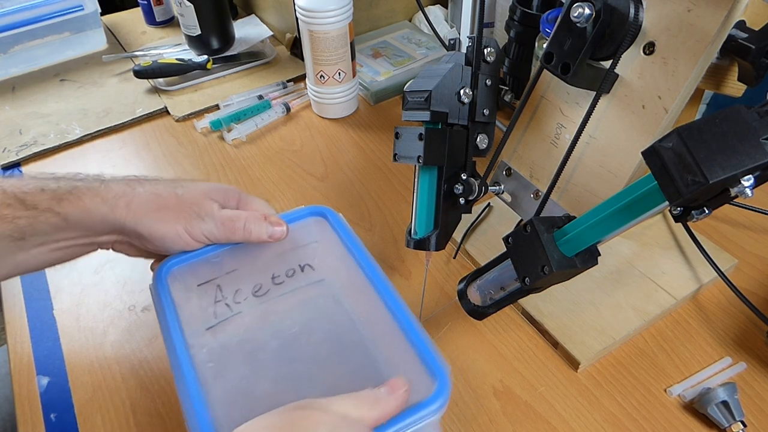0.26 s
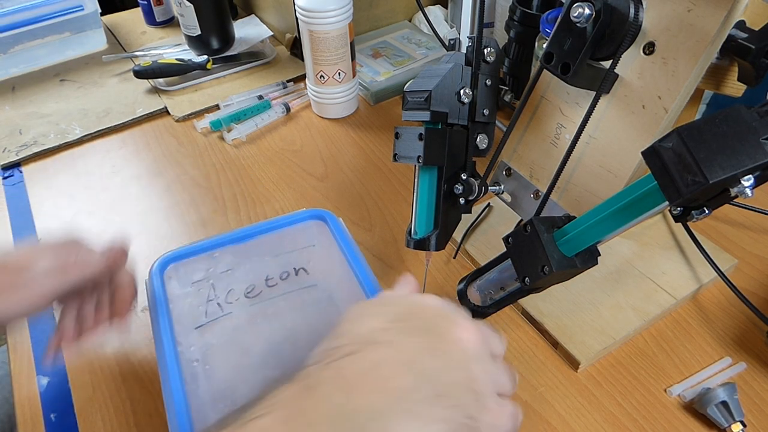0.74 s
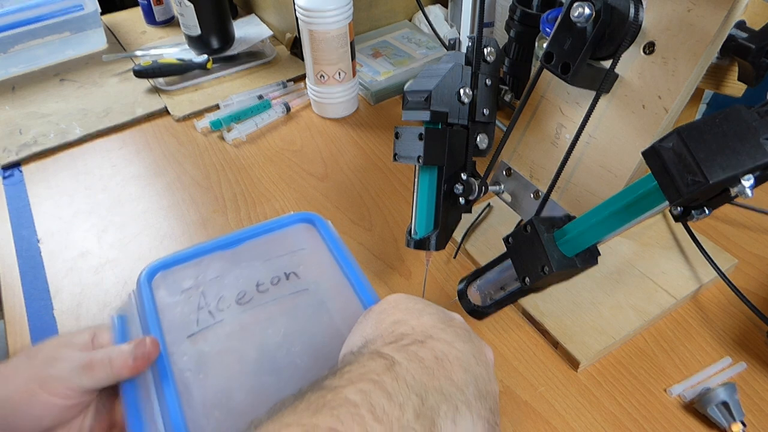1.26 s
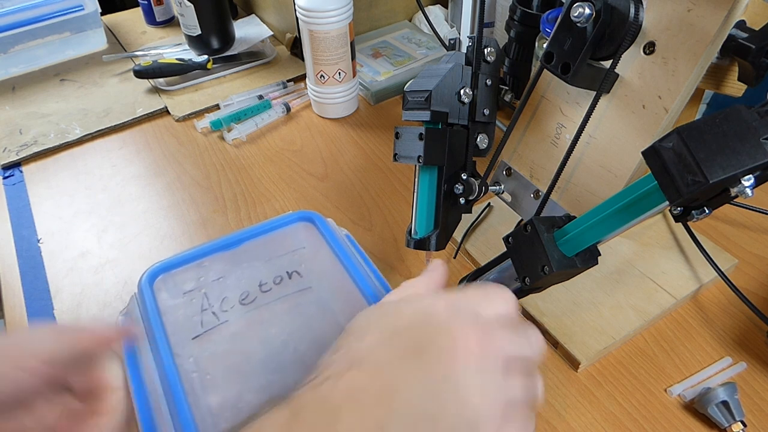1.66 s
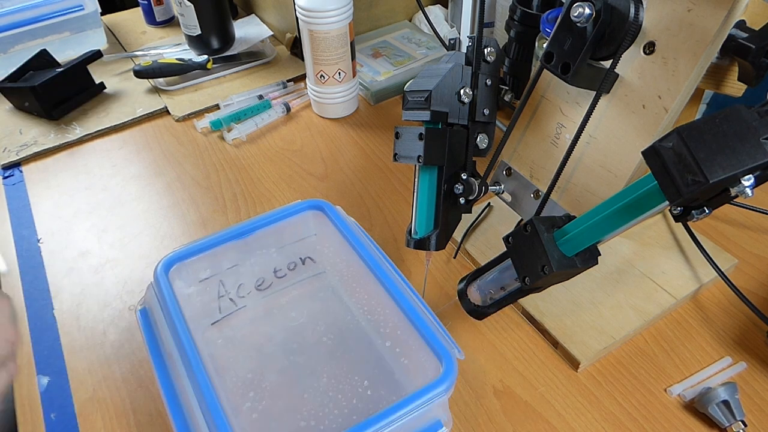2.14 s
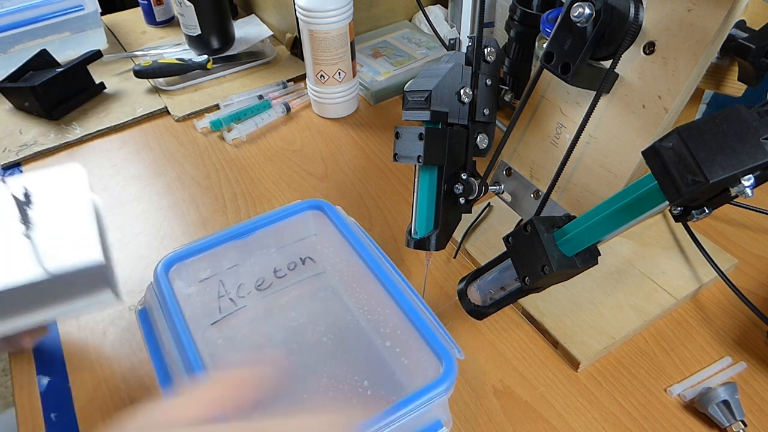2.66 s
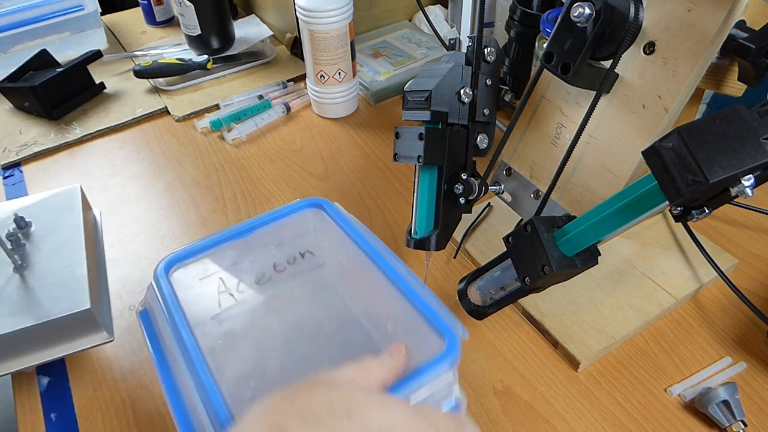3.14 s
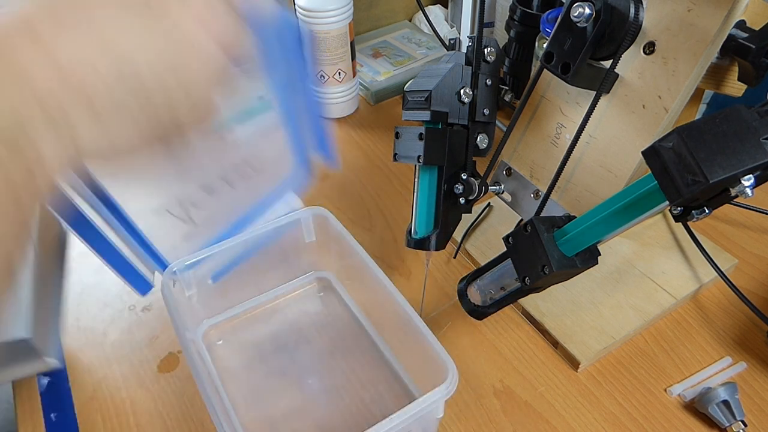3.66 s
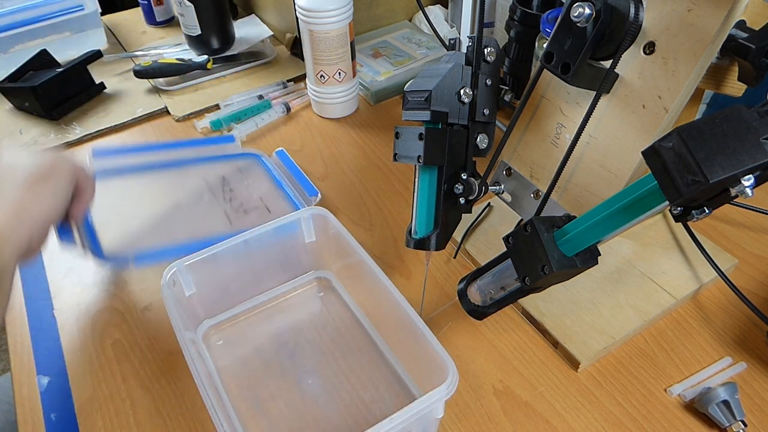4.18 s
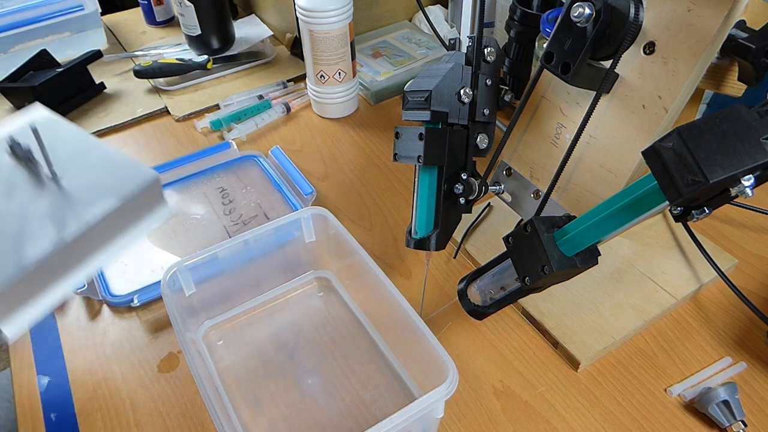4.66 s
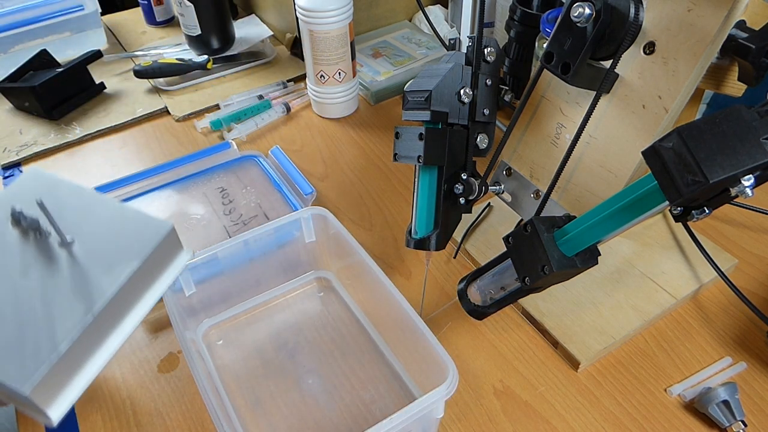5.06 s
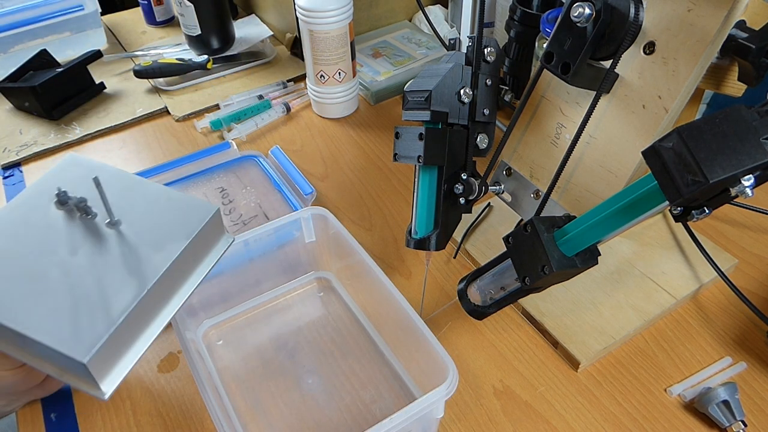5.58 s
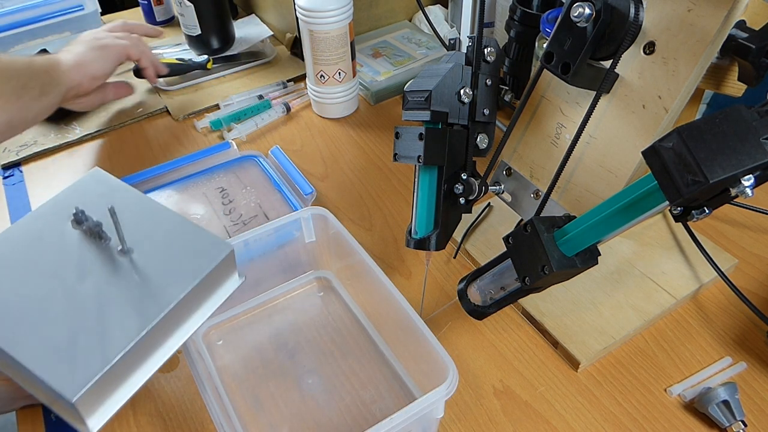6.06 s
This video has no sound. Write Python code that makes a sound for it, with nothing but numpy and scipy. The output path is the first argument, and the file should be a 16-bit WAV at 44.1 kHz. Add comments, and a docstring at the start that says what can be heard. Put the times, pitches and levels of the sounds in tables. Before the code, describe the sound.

A small workshop heard close up in stereo, with soft steady air noise, a low fan hum and a very faint, thin, wavering high whine throughout. At about 0.2 s a flap on a sealed plastic box snaps, a sharp crack with a short hollow boom through the wooden bench. Faint bumps and a light rub follow, with a small judder near 0.9-1.1 s. At 1.3 s two more snaps come almost together, equally loud and drum-like. Only faint sliding until a softer knock at 2.9 s and a weaker one at 3.15 s. From 3.5 to 3.8 s the lid works loose with small dull bumps. It clatters onto the bench from 3.95 s: a thin bright crack, then hard dry clacks at 4.1 and 4.25 s, the strongest at 4.4 s. Near-quiet follows, with a soft bump at 6.0 s and a tiny bright tool tick and rub at 6.2 s.

```python
"""Snap-lock box opened in a workshop

Flaps snap and make a closed plastic box boom on a wooden bench; the freed lid clatters down beside it.
Box and lid are decaying modes led by a scattered impulse, each blow set to its own band levels.
Hands bump (short swelling tones) and rub (resonant noise); a small tool ticks (a decaying noise burst).
Behind them: coloured air noise, a fan's hum of narrow noise resonances and a thin wavering whine."""
import sys
import numpy as np
from scipy import signal
from scipy.fft import rfft, irfft
from scipy.io import wavfile

SR = 44100
rng = np.random.default_rng(int(sys.argv[2]) if len(sys.argv) > 2 else 0)


def waveform_to_disk(signal):
    """Save audio, clipped to [-1, 1], as 16-bit WAV at the path in sys.argv[1]."""
    frames = np.transpose(np.atleast_2d(signal))
    scaled = np.clip(frames, -1, 1) * 32767
    samples = np.round(scaled).astype(np.int16)
    wavfile.write(sys.argv[1], SR, samples)


N = 278680
BLOW_S = 0.35  # buffer length of blows, bumps, ticks and room response

BENCH_HZ, EDGE_HZ = 171, 8100  # wooden bench, hard edge of the lid
# fall of level (below, above) the pitch of a sounding part [dB per octave]
BOOM_FALL, SNAP_FALL = (20.6, 14), (10, 9)
CLACK_FALL, CRACK_FALL = (15.5, 12.7), (3, 3)
THUD_FALL = (9, 9)

# modes of the closed box: (frequency [Hz], relative level [dB], t60 [s])
BOX_MODES = [(189, -6, 0.091), (253.3, -3.5, 0.052), (288, -11, 0.085), (331.7, -5.5, 0.074),
             (395, 2, 0.03), (479, -2.5, 0.032), (572, -4, 0.023), (702, 4.5, 0.016), (873, -1.5, 0.018),
             (1087, -7.5, 0.035), (1314, -21, 0.039), (1690, -9, 0.0057), (2166, -4.5, 0.0077),
             (2430, -28, 0.12), (2550, -29, 0.095), (3100, -6, 0.019), (4250, -6.5, 0.016),
             (5270, -18, 0.0075)]
# flaps snapping, box knocking on the bench, relative levels:
# (time [s], wall pitch [Hz], boom [dB], struck spot pitch [Hz], snap [dB], bench thud [dB])
BOX_BLOWS = [(0.164, 446, -10, 1900, -23.5, -23.5), (1.3205, 344, -11, 2900, -26, -24),
             (1.3744, 332, -11.5, 2480, -21.5, -37), (2.9305, 370, -20, 640, -39, -39),
             (3.1507, 300, -30, 443, -52, -45)]


def box():
    """The flaps let go and the sealed box booms like a drum."""
    out = np.zeros((2, N))
    for time_s, wall_hz, boom_db, spot_hz, snap_db, thud_db in BOX_BLOWS:
        boom = (wall_hz, boom_db, BOOM_FALL)
        snap = (spot_hz, snap_db, SNAP_FALL)
        thud = (BENCH_HZ, thud_db, THUD_FALL)
        sound = blow(BOX_MODES, spot_hz, band_levels(boom, snap, thud),
                     spot_db=4, spot_q=16, swell_cycles=0.34, crack_db=25, spread_s=0.00022,
                     crack_low_hz=660, scatter_db=4.0, tail_db=-6.5)
        add(out, time_s, sound)
    return from_db(1.55) * out


# modes of the loose lid: (frequency [Hz], relative level [dB], t60 [s])
LID_MODES = [(196, -18, 0.08), (282.2, -16.5, 0.054), (370, -10, 0.06), (545, -14.5, 0.052),
             (700, -9.5, 0.015), (856, -3, 0.032), (1004, -8.5, 0.042), (1132, -15, 0.036),
             (1420, -10.5, 0.012), (1940, -22, 0.04), (2600, -12, 0.018), (3190, -6.5, 0.016),
             (4820, -15, 0.012), (6890, 0, 0.0086), (9700, -21, 0.003)]
# lid and its flaps hitting the bench, relative levels:
# (time [s], struck spot pitch [Hz], clack [dB], crack [dB], bench thud [dB])
LID_BLOWS = [(3.9464, 927, -39, -32.5, -51), (3.9774, 475, -37.5, -40.5, -33),
             (3.9814, 1090, -50, -49, -54), (4.128, 890, -24.5, -42, -35.5), (4.1395, 1900, -44, -50, -52),
             (4.227, 1040, -25, -47.5, -36.5), (4.2589, 921, -21, -48, -38.5),
             (4.4065, 883, -12.5, -37, -40)]


def lid():
    """The free lid is lighter: each hit clacks near the pitch of the struck spot."""
    out = np.zeros((2, N))
    for time_s, spot_hz, clack_db, crack_db, thud_db in LID_BLOWS:
        clack = (spot_hz, clack_db, CLACK_FALL)
        edge = (EDGE_HZ, crack_db, CRACK_FALL)
        thud = (BENCH_HZ, thud_db, THUD_FALL)
        sound = blow(LID_MODES, spot_hz, band_levels(clack, edge, thud),
                     spot_db=2, spot_q=12.4, swell_cycles=1.0, crack_db=25.0, spread_s=0.00018,
                     crack_low_hz=920, scatter_db=3.5, tail_db=-4)
        add(out, time_s, sound)
    return from_db(0.5) * out


def blow(modes, spot_hz, band_db, spot_db, spot_q, swell_cycles, crack_db, spread_s, crack_low_hz,
         scatter_db, tail_db, chatter_db=-11, chatter_s=0.005, chatter_count=3):
    """A crack leads, modes of random strength swell and ring, the struck spot adds a short ring."""
    t = time_axis()
    hz, db, t60_s = np.transpose(modes)[:, :, None]
    strength = from_db(db + scatter_db * rng.standard_normal(hz.shape))
    swell = 1 - np.exp(-t * hz / swell_cycles)  # bending waves spread more slowly the lower they are
    decay = from_db(-60 * t / t60_s)
    ring = np.sum(strength * swell * np.sin(2 * np.pi * hz * t) * decay, axis=0)
    spot_decay = np.exp(-np.pi * spot_hz * t / spot_q)
    spot = from_db(spot_db) * np.sin(2 * np.pi * spot_hz * t) * spot_decay

    contact = crack(len(t), spread_s)
    lags = (rng.uniform(0.15, 1, chatter_count) * chatter_s * SR).astype(int)
    for lag in lags:  # the edge chatters before it settles
        contact[lag:] += from_db(chatter_db) * crack(len(t) - lag, spread_s)
    contact = from_db(crack_db) * cut(contact, crack_low_hz, "high", order=2)

    sound = workshop(radiated(ring + spot + contact), tail_db)
    return voiced(voiced(sound, band_db), band_db)  # twice, as neighbouring bands overlap


def crack(size, spread_s, count=9, feedback=0.82):
    """Thin walls scatter an impulse through all-passes into a dense burst with every pitch alike."""
    burst = signal.unit_impulse(size)
    for lag in np.ceil(rng.uniform(0.05, 1, count) * spread_s * SR).astype(int):
        loop = np.r_[1, np.zeros(lag - 1), feedback * rng.choice([-1, 1])]
        burst = signal.lfilter(loop[::-1], loop, burst + 1e-18)
    return burst


# edges of the bands that set the force of a blow: (frequency [Hz])
BAND_EDGES_HZ = [110, 220, 420, 800, 1400, 3300, 6000, 14000]


def band_levels(*parts):
    """Sums the power of sounding parts (pitch Hz, dB, fall below and above it) in each band."""
    edges, power = np.array(BAND_EDGES_HZ), 0
    centres = np.sqrt(edges[1:] * edges[:-1])
    for hz, db, (below, above) in parts:
        octaves = np.log2(centres / hz)
        fall = np.where(octaves < 0, below, above)
        power = power + from_db(db - fall * np.abs(octaves)) ** 2
    return 10 * np.log10(power)


def voiced(x, band_db):
    """A causal equaliser steers the band levels of a blow's first 30 ms to their targets."""
    size, head, edges = 2 ** 15, int(0.03 * SR), np.array(BAND_EDGES_HZ)
    hz = np.maximum(np.fft.rfftfreq(size, 1 / SR), 1)
    power = 2 * np.abs(rfft(x.mean(0)[:head], size)) ** 2 / (size * head)
    now_db = [10 * np.log10(power[(hz >= low) & (hz < high)].sum())
              for low, high in zip(edges, edges[1:])]
    log_centres = np.log(edges[1:] * edges[:-1]) / 2
    gain = from_db(np.interp(np.log(hz), log_centres, np.array(band_db) - now_db))
    cepstrum = irfft(np.log(gain))[:size // 2]  # minimum phase: nothing sounds early
    cepstrum[1:] *= 2
    return irfft(rfft(x, size) * np.exp(rfft(cepstrum, size)))[:, :x.shape[1]]


# single soft bumps of hands and things: (time [s], relative peak [dB], pitch [Hz])
BUMPS = [(.004, -35, 337), (0.44, -39.5, 208), (1.009, -31, 332), (1.018, -30, 612), (1.119, -39.5, 388),
         (3.472, -31.5, 500), (3.516, -38, 600), (3.667, -33.5, 516), (3.794, -24.5, 522),
         (3.796, -33, 1110), (6.015, -37, 198)]


def bumps(cycles=1.17, spread=1.53, side_db=-6):
    """A soft contact swells and dies within a few cycles, around a pitch set by what is touched."""
    out, t = np.zeros(N), time_axis()
    for time_s, db, hz in [*BUMPS, *slips()]:
        turn, age = 2 * np.pi * hz * t, hz * t / cycles
        sides = from_db(side_db) * (np.sin(turn * spread) - np.sin(turn / spread))
        thump = (np.sin(turn) + sides) * age * np.exp(-age)
        add(out, time_s, from_db(db) * thump / np.abs(thump).max())
    return from_db(-2.0) * out


# box juddering over the bench, lid working loose:
# (start [s], length [s], relative peak [dB], pitch [Hz])
SHUFFLES = [(0.886, .08, -34, 225), (1.863, .05, -40, 125), (3.522, .03, -41, 200), (3.674, .015, -32, 169)]
SLIPS_PER_S, SLIP_JITTER_PERIODS = 60, 0.1447
SLIP_SCATTER_DB, SLIP_PITCH_SPREAD = 1.5, 0.12  # pitch spread in natural-log units


def slips():
    """A shuffle sticks and slips: an uneven run of soft bumps, as (s, relative peak dB, pitch Hz)."""
    for start_s, length_s, db, hz in SHUFFLES:
        ages = np.arange(0, length_s, 1 / SLIPS_PER_S)
        for age, (late, strong, high) in zip(ages, rng.standard_normal((32, 3))):
            time_s = start_s + age + SLIP_JITTER_PERIODS * late / SLIPS_PER_S
            yield time_s, db + SLIP_SCATTER_DB * strong, hz * np.exp(SLIP_PITCH_SPREAD * high)


# skin and plastic sliding:
# (start [s], length [s], relative level [dB], centre [Hz], width [Hz])
RUBS = [(0.398, 0.12, -57.5, 3300, 1510), (1.648, 0.046, -52.5, 2260, 2710), (1.842, 0.26, -69, 9000, 7000),
        (2.223, 0.05, -57, 1730, 600), (2.872, 0.087, -51.5, 3530, 1050), (4.491, 0.056, -61.5, 9500, 6000),
        (6.199, 0.091, -58.5, 3500, 2560), (6.203, 0.11, -58.5, 9600, 4500)]


def rubs(grain_db=3, hiss_db=-9, hiss_hz=10000, hiss_width_hz=4000):
    """Sliding is a stream of tiny slips into a broad resonance, with a fine hiss on top."""
    out = np.zeros(N)
    for start_s, length_s, db, hz, width_hz in RUBS:
        size = int(length_s * SR)
        grains = rng.standard_normal(size) * from_db(grain_db * rng.standard_normal(size))
        body = rms_one(resonance(resonance(grains, hz, width_hz), hz, width_hz * 2))
        hiss = rms_one(resonance(grains, hiss_hz, hiss_width_hz))
        fade = signal.windows.tukey(size, 0.4)
        add(out, start_s, from_db(db) * (body + from_db(hiss_db) * hiss) * fade)
    return from_db(0.5) * out


# a small tool is touched: (time [s], peak [dB], centre [Hz], width [Hz])
TOOL_TICKS = [(6.2035, -33.5, 3600, 2500)]


def tool(decay_s=0.0043):
    """A light, bright tick: a decaying noise burst through a broad resonance."""
    out, t = np.zeros(N), time_axis()
    for time_s, db, hz, width_hz in TOOL_TICKS:
        tick = resonance(rng.standard_normal(len(t)) * np.exp(-t / decay_s), hz, width_hz)
        add(out, time_s, from_db(db) * tick / np.abs(tick).max())
    return out


# near reflections off bench, drill stand and wall: (delay [s], level [dB], left minus right [dB])
ECHOES = [(.0036, -15.5, -1), (0.0114, -14.5, 0.5), (.0145, -18.5, -5.5), (0.028, -18.5, -1.5)]
# reverberation time: (frequency [Hz], t60 [s])
ROOM_T60 = [(120, 0.39), (300, 0.29), (800, 0.2636), (2500, 0.2625), (6000, 0.2843), (13000, 0.11)]
# reverberation spectrum: (frequency [Hz], relative density [dB per Hz])
ROOM_COLOUR = [(80, -11.5), (200, -2.5), (500, -2.5), (900, -3.5), (1500, 2.5), (4000, -2.5), (8000, -1.5),
               (15000, 5.5)]
# left-right likeness of the reverberation: (frequency [Hz], likeness [0-1])
ROOM_LIKENESS = [(200, 1), (700, 1), (1500, 0.74), (4000, 0.41), (12000, .3)]


def workshop(x, tail_db, build_s=0.0018):
    """Direct sound, a few near reflections and a short diffuse tail, drawn anew at each call."""
    t = time_axis()
    tail = sum(band * from_db(-60 * t / at_hz(ROOM_T60, hz))
               for hz, band in noise_bands(ROOM_COLOUR, ROOM_LIKENESS, len(t)))
    tail = tail * (1 - np.exp(-(t / build_s) ** 2))
    response = from_db(tail_db) * rms_one(tail) / np.sqrt(len(t))
    response[:, 0] += 1
    for delay_s, db, pan_db in ECHOES:
        response[:, round(delay_s * SR)] += from_db([db + pan_db / 2, db - pan_db / 2])
    return signal.fftconvolve(x[None], response, axes=1)[:, :len(x)]


# workshop air spectrum: (frequency [Hz], relative density [dB per Hz])
AIR = [(25, -2), (55, -23), (95, -7.5), (200, -4), (330, -2), (750, -1.5), (1000, -6.5), (1600, -6),
       (2300, -14), (4200, -16.5), (5300, -21), (8300, -22.5), (11000, -20), (15000, -28)]
# left-right likeness of the air: (frequency [Hz], likeness [0-1])
AIR_LIKENESS = [(60, 0.95), (150, 0.76), (380, 0.81), (950, 0.06), (2380, 0.29), (5980, 0.37),
                (15000, 0.39)]
# fan resonances: (frequency [Hz], width [Hz], level [dB])
HUM = [(212, 22, -64.5), (424.9, 20, -62), (844.6, 41, -70), (3285, 45, -77), (3980, 36, -80.5),
       (4714, 69, -74.5), (12100, 120, -90)]
AIR_DB, WHINE_HZ, WHINE_DB = -53.5, 6204, -72.5


def background(flutter=0.15):
    """Steady air noise, a fan's narrow noise resonances and an electrical whine of wavering level."""
    white = sum(band for hz, band in noise_bands([(1000, 0)], AIR_LIKENESS, N))
    air = from_db(AIR_DB) * rms_one(coloured(white, AIR))
    hum = np.zeros(N)
    for hz, width_hz, db in HUM:
        narrow = resonance(resonance(rng.standard_normal(N), hz, width_hz), hz, width_hz)
        hum += from_db(db) * rms_one(narrow)
    waver = 1 + flutter * rms_one(cut(rng.standard_normal(N), 16, "low", order=2))
    tone = np.sin(2 * np.pi * WHINE_HZ * np.arange(N) / SR)
    return air + hum + from_db(WHINE_DB) * rms_one(waver * tone)


def noise_bands(colour, likeness, size):
    """Yields (Hz, stereo noise) in half-octave bands; likeness sets how far the two sides agree."""
    edges = 32 * 2 ** np.arange(0, 9.1, 0.5)
    settle = 4000  # samples dropped while the filter starts up
    for low, high in zip(edges, edges[1:]):
        hz = np.sqrt(low * high)
        band = signal.butter(3, [low, high], "band", fs=SR, output="sos")
        mid, side = signal.sosfilt(band, rng.standard_normal((2, size + settle)))[:, settle:]
        alike = np.clip(at_hz(likeness, hz), 0, 1)
        stereo = np.sqrt(1 + alike) * mid + np.sqrt(1 - alike) * side * [[1], [-1]]
        yield hz, from_db(at_hz(colour, hz)) * stereo


def radiated(x, low_hz=135, high_hz=11900):
    """Small plastic things give off neither deep bass nor the very top."""
    return cut(cut(x, low_hz, "high", order=6), high_hz, "low", order=8)


def resonance(x, hz, width_hz):
    """Two-pole resonance with about unit gain at its peak."""
    r = np.exp(-np.pi * width_hz / SR)
    poles = [1, -2 * r * np.cos(2 * np.pi * hz / SR), r * r]
    return signal.lfilter(np.array([1, 0, -1]) * (1 - r * r) / 2, poles, x)


def cut(x, hz, kind, order):
    """Butterworth high- or low-pass."""
    return signal.sosfilt(signal.butter(order, hz, kind, fs=SR, output="sos"), x)


def coloured(x, table, amount=1):
    """Shapes a sound by a table of (Hz, dB)."""
    hz = np.maximum(np.fft.rfftfreq(N, 1 / SR), 1)
    return irfft(rfft(x) * from_db(amount * at_hz(table, hz)), N)


def at_hz(points, hz):
    """Reads a table along log frequency."""
    points = np.array(points)
    return np.interp(np.log(hz), np.log(points[:, 0]), points[:, 1])


def from_db(db):
    """Amplitude factor of a level in dB."""
    return 10 ** (np.asarray(db) / 20)


def rms_one(x):
    """Scales to unit RMS."""
    return x / np.sqrt(np.mean(x ** 2) + 1e-20)


def time_axis():
    """Seconds along one blow buffer."""
    return np.arange(int(BLOW_S * SR)) / SR


def add(track, time_s, sound):
    """Mixes a sound in at a time."""
    start = max(round(time_s * SR), 0)
    part = sound[..., :max(N - start, 0)]
    track[..., start:start + part.shape[-1]] += part


# left minus right of the close sounds: (frequency [Hz], difference [dB])
BALANCE_DB = [(300, -0.6), (1200, -2), (4000, -0.2), (10000, 2.5)]


def scene():
    """Blows and handling close by, the workshop behind them."""
    handling = workshop(radiated(bumps() + rubs() + tool(), low_hz=90.5), tail_db=-4.0)
    close = box() + lid() + handling
    return coloured(close, BALANCE_DB, amount=np.array([[0.5], [-0.5]])) + background()


PEAK_CEILING, CUTOFF_HZ = 0.93, 15700  # ceiling as amplitude, ahead of the filters


def record(dry, low_cut_hz=60, high_cut_hz=14500):
    """Loud peaks are rounded, deep bass is thinned, and the sound stops steeply just below 16 kHz."""
    rounded = dry / (1 + (dry / PEAK_CEILING) ** 4) ** 0.25
    thin = cut(cut(rounded, low_cut_hz, "high", order=1), high_cut_hz, "low", order=4)
    return signal.sosfilt(signal.ellip(10, 0.1, 90, CUTOFF_HZ, fs=SR, output="sos"), thin)


dry = scene()
out = record(dry)
waveform_to_disk(out)
```